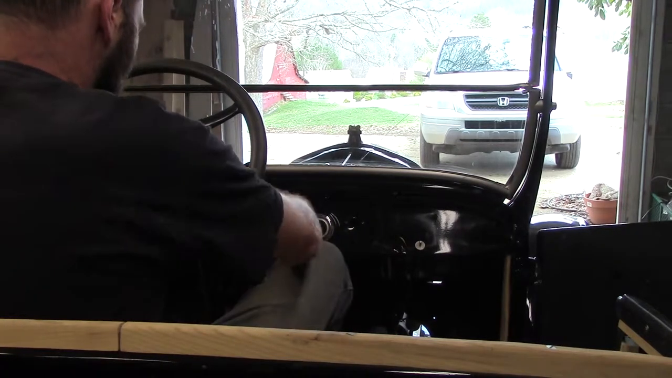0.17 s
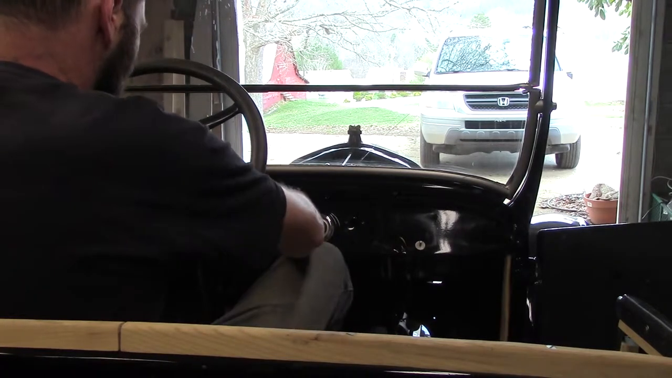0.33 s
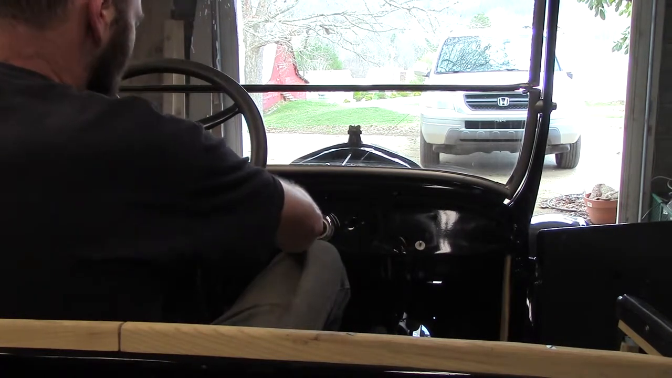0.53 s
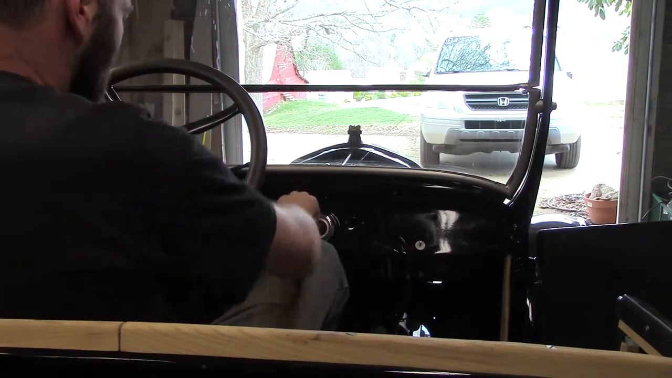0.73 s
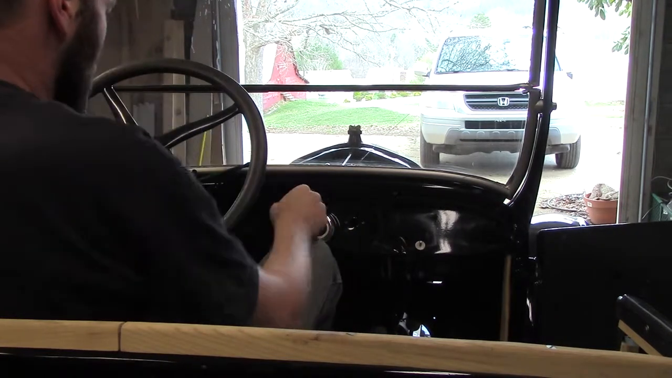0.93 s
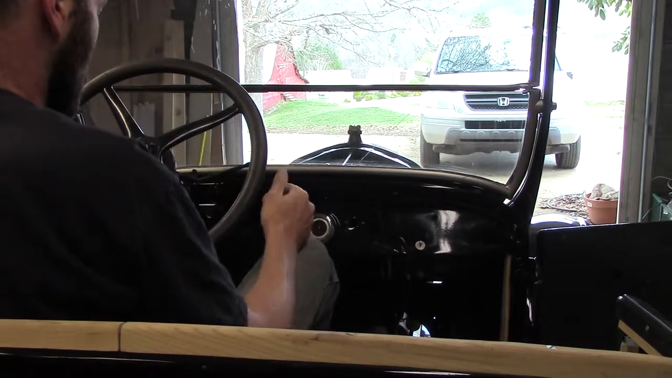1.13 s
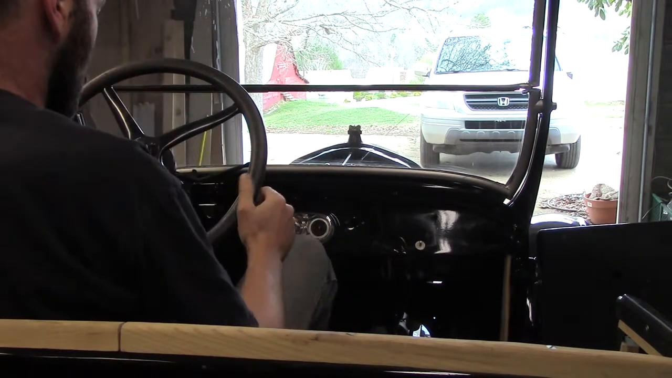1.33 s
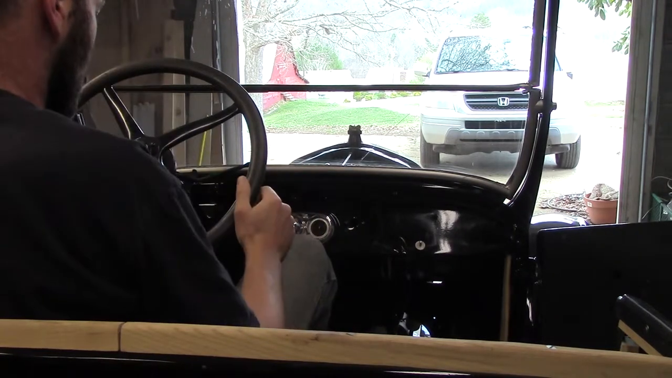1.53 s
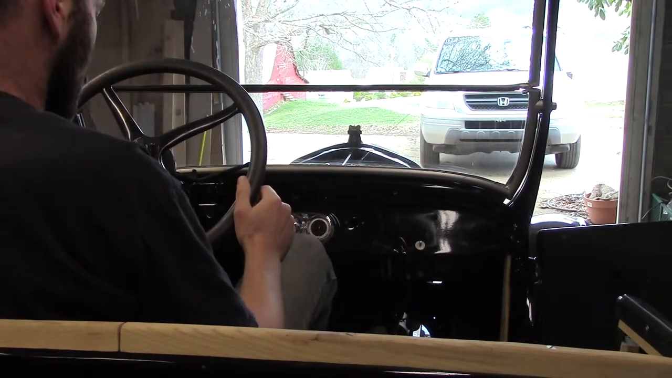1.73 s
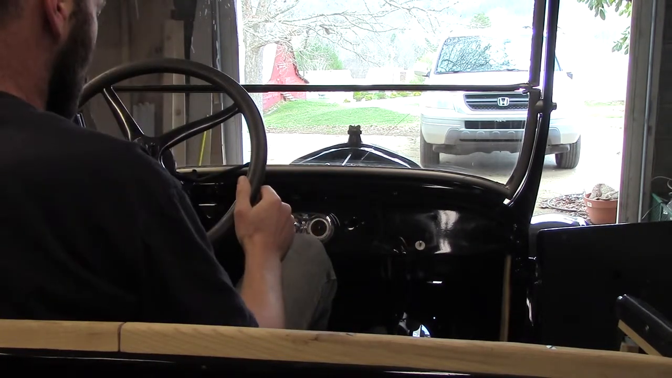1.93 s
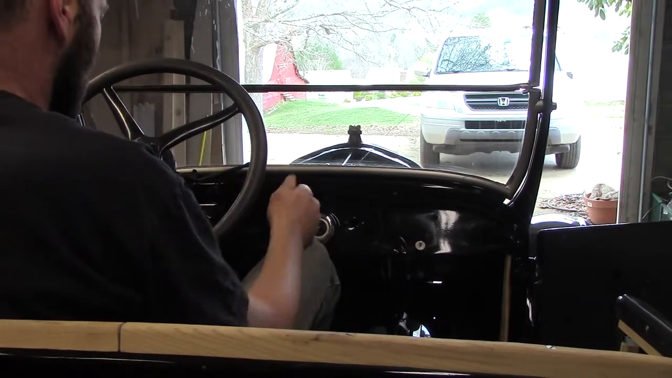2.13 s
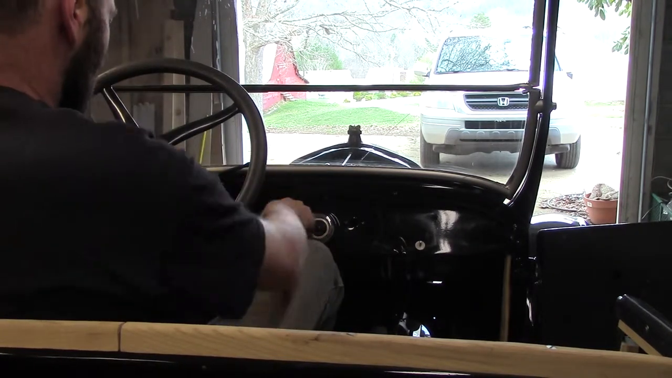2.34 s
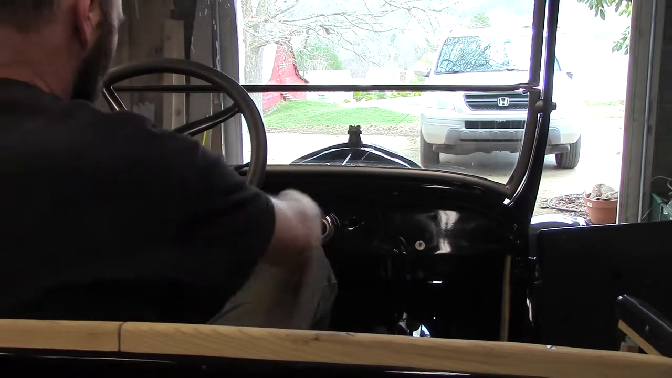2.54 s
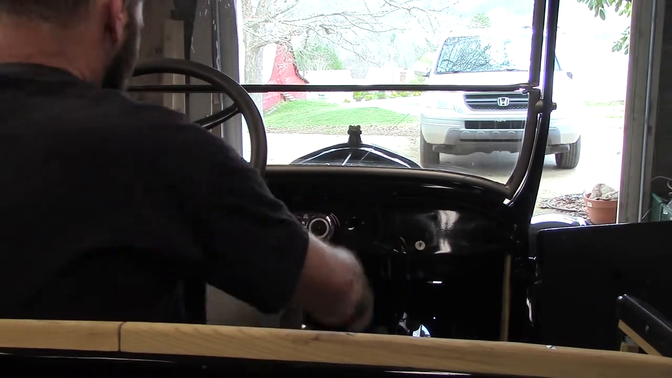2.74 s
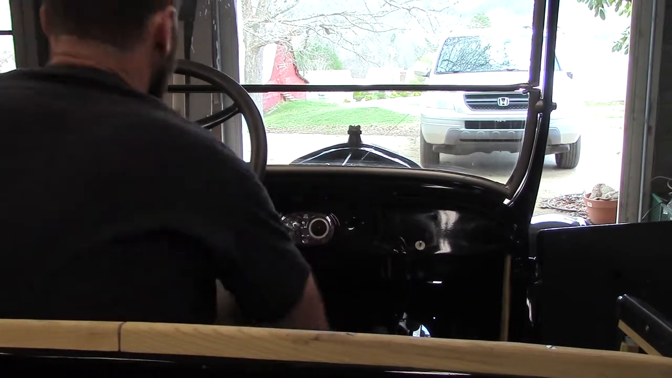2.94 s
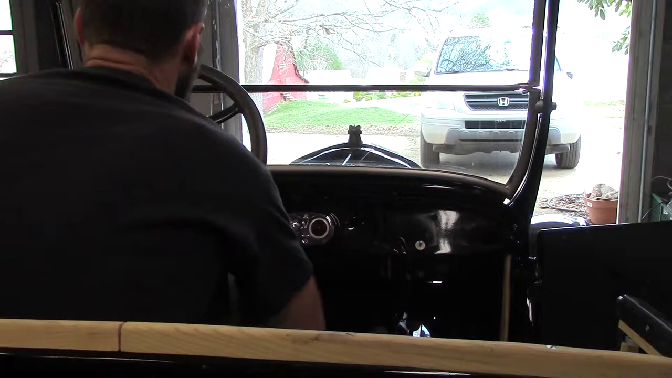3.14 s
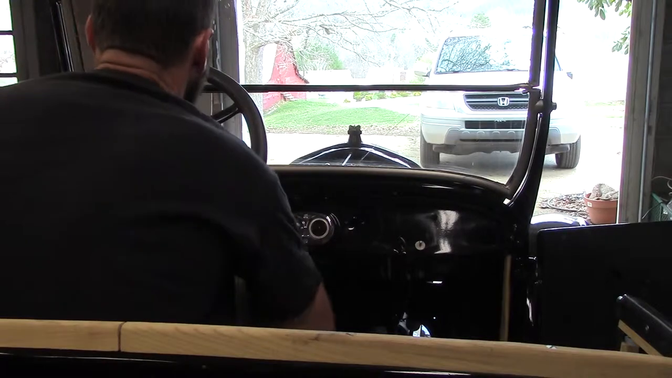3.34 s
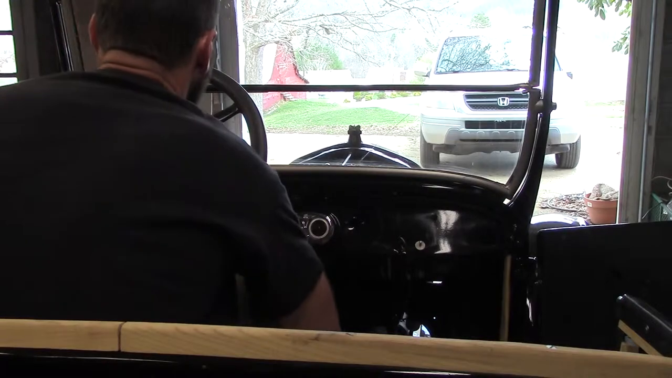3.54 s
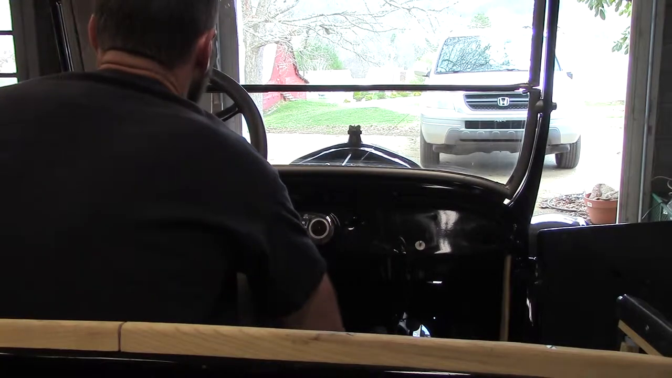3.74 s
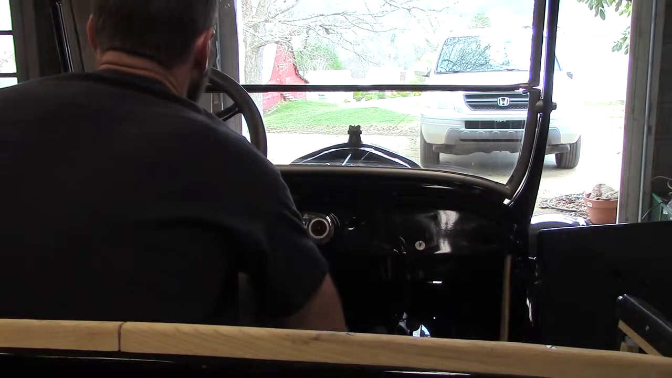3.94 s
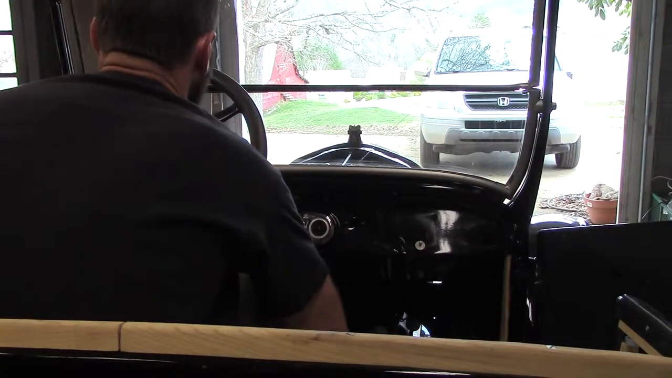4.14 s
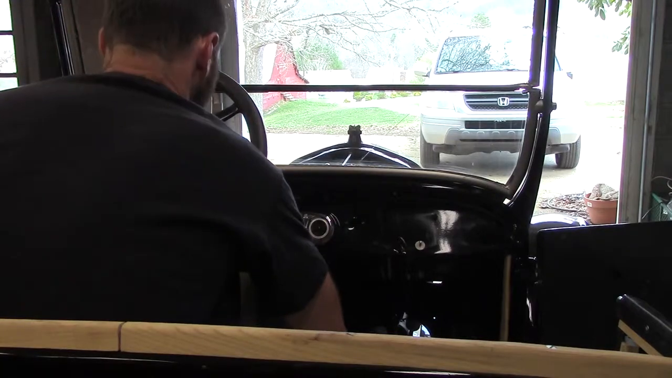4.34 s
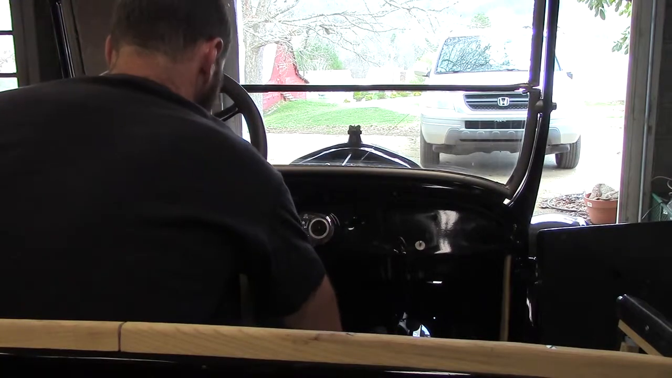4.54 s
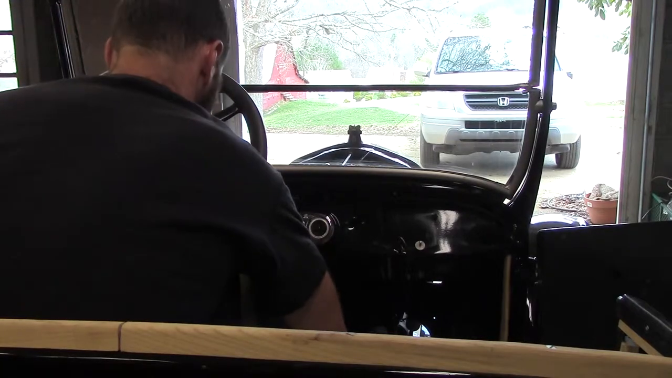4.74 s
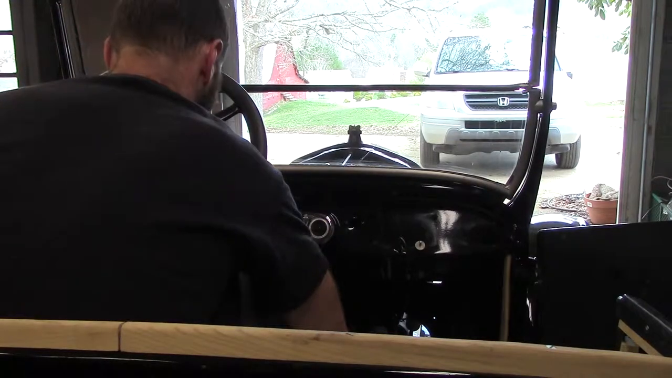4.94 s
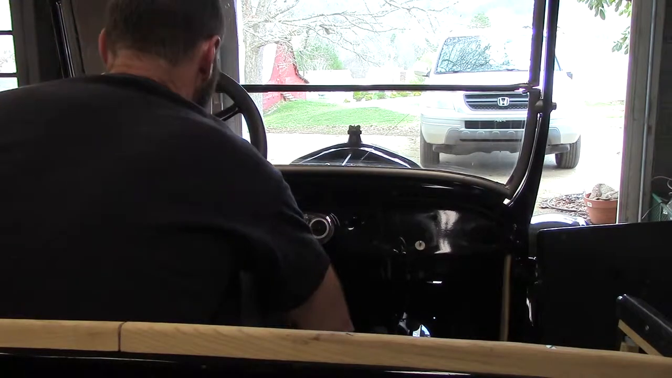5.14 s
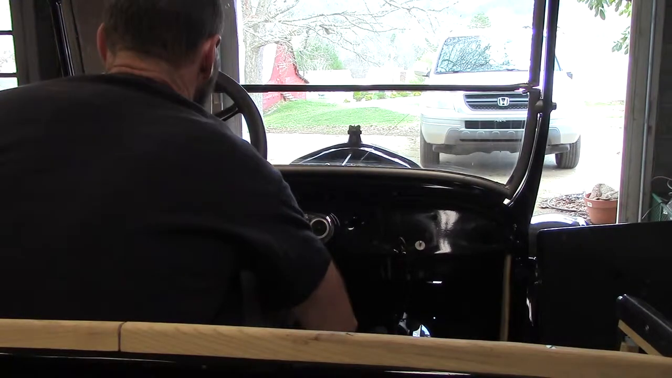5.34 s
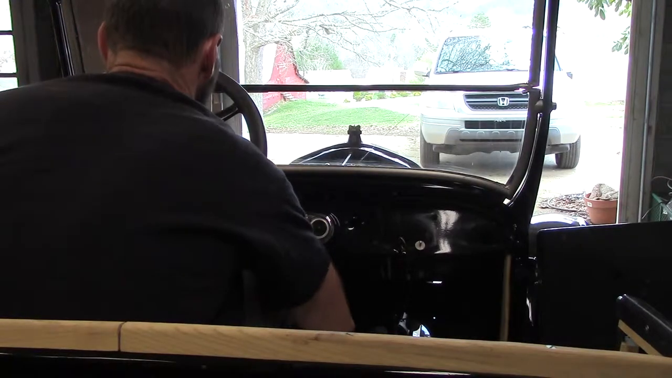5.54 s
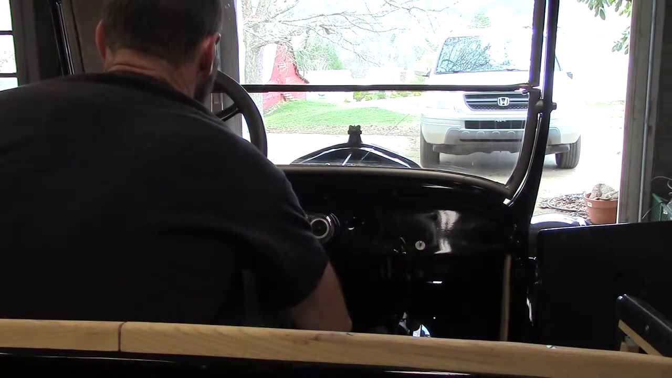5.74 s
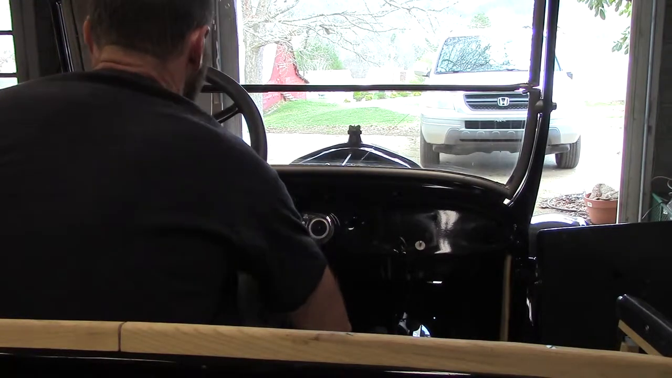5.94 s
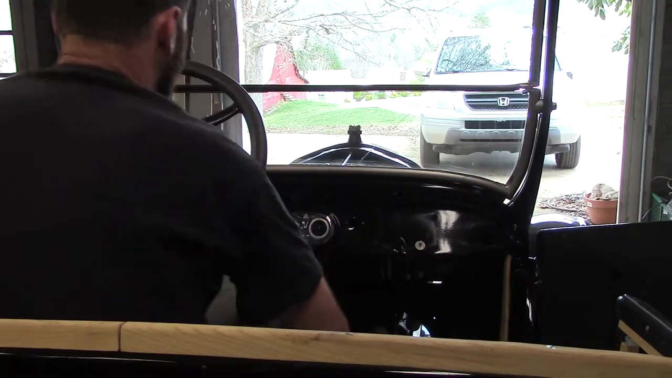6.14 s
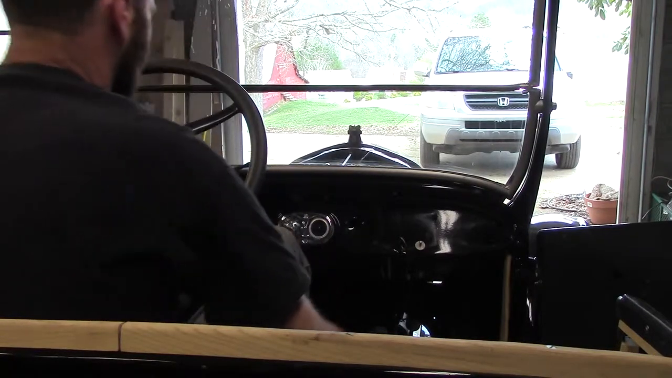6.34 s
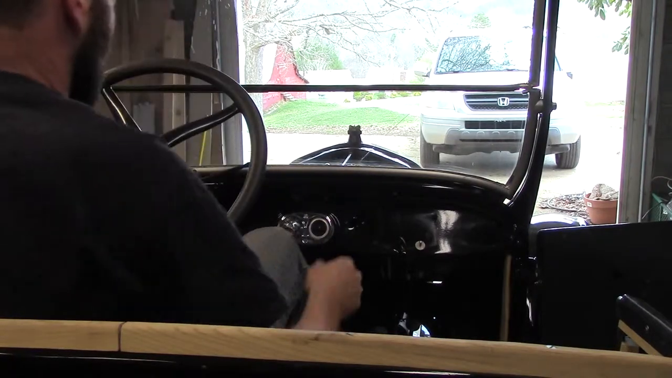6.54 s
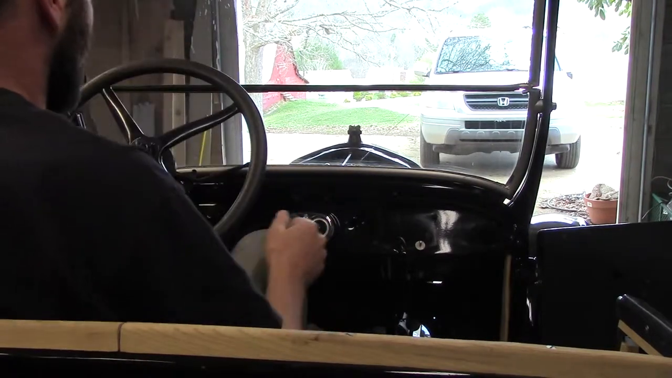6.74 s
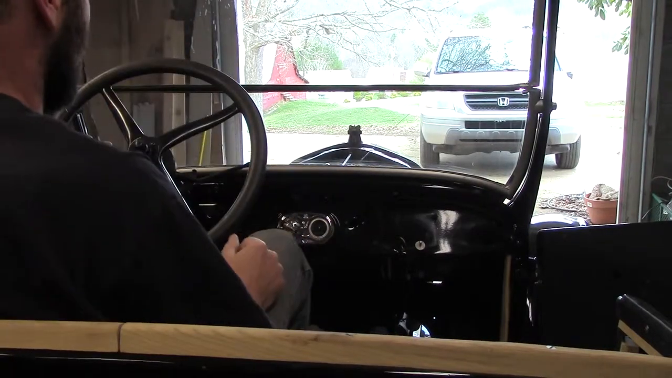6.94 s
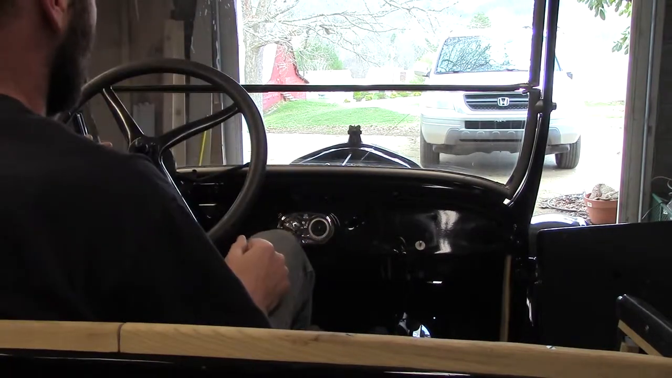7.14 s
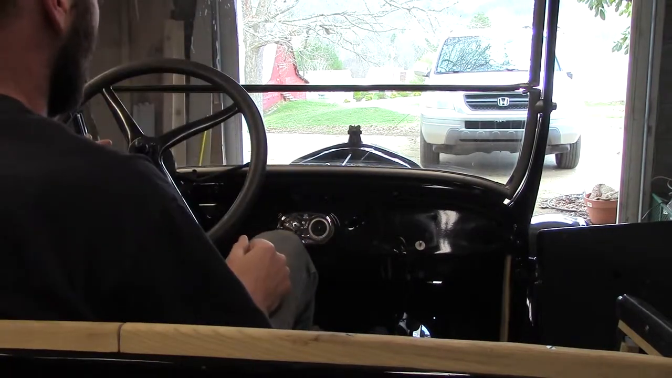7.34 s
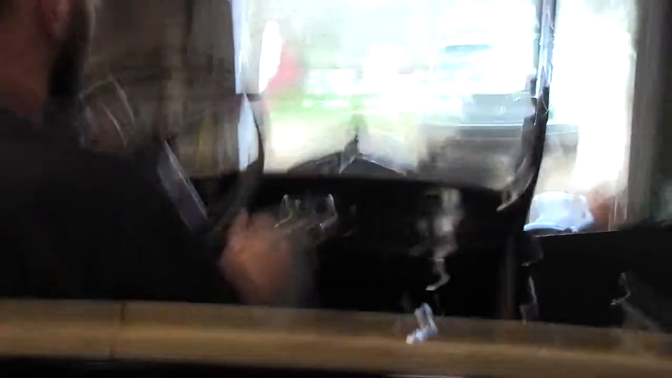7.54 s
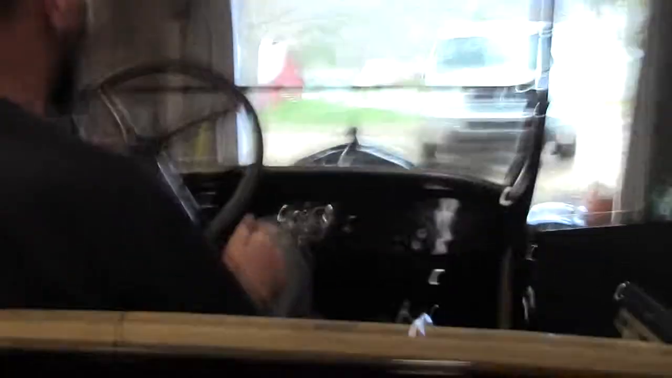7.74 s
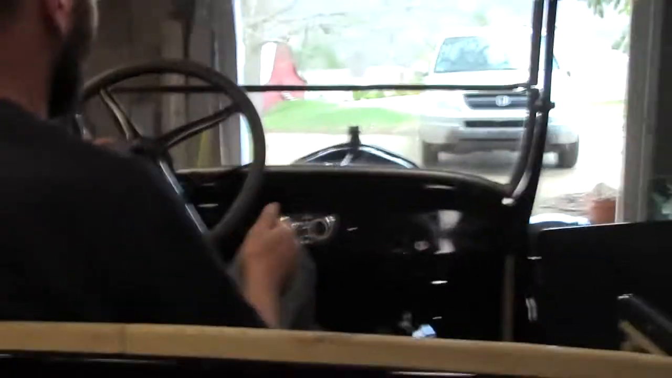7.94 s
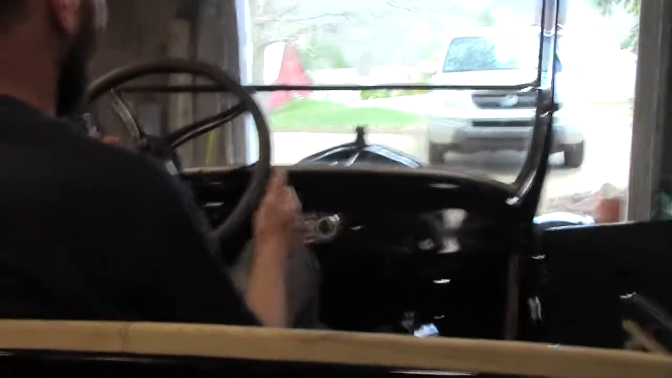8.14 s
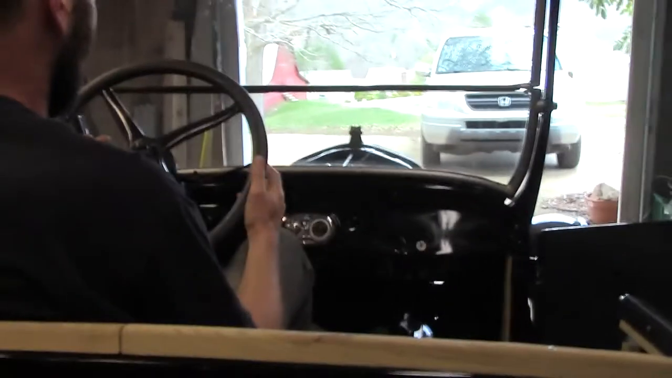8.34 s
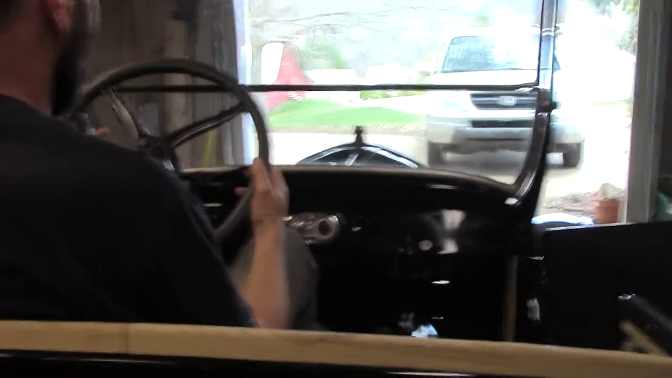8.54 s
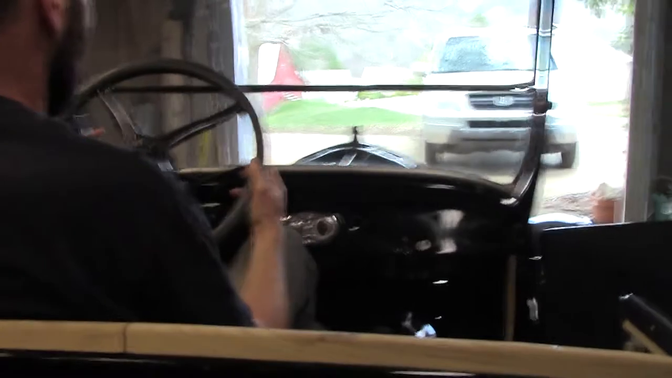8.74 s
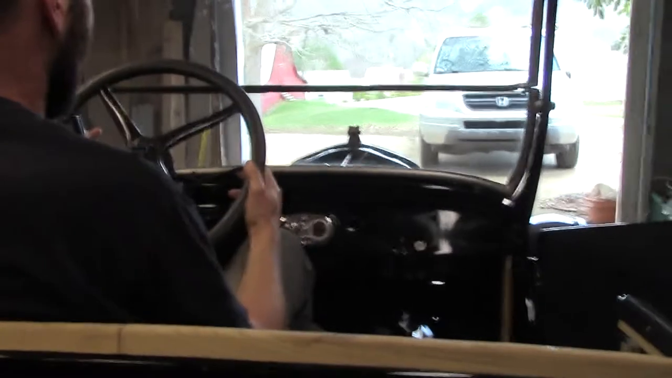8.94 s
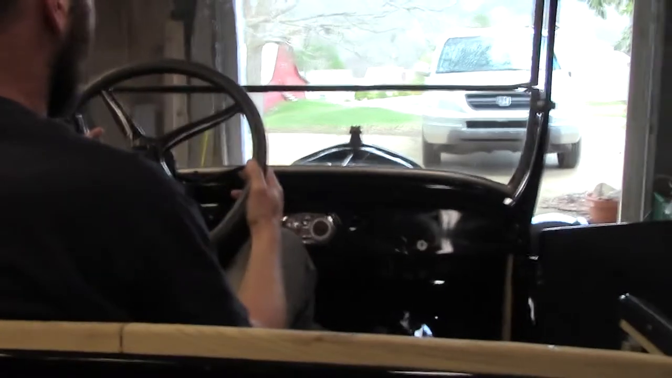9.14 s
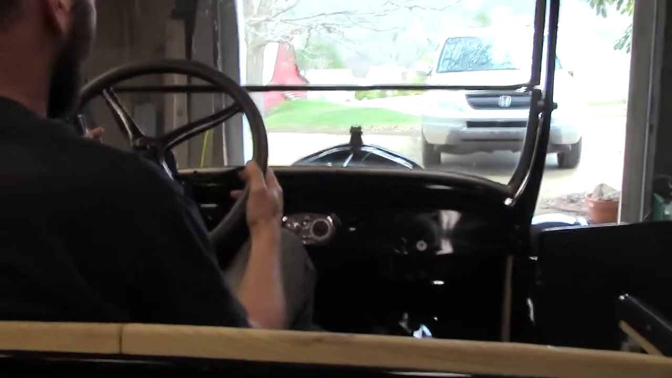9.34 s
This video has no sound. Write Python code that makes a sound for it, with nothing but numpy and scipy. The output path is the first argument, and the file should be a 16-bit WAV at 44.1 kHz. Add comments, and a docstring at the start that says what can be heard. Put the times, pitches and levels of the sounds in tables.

```python
"""An old car in an open garage, heard from close by through the two ports of one camera microphone.
Outside, a motor drones steadily throughout. Near at hand the driver shifts about, works key and levers
and knocks the floorboards. At 5.5 s the spring blade of an ignition coil starts to buzz. Two seconds
later the starter grinds into the flywheel and the buzz dies away; the engine is cranked, wheezing at
every compression, and the body shudders on its springs."""
import sys
import numpy as np
from scipy import signal
from scipy.fft import rfft, irfft, next_fast_len
from scipy.io import wavfile
from scipy.ndimage import map_coordinates

SR = 44100
rng = np.random.default_rng(int(sys.argv[2]) if len(sys.argv) > 2 else 0)


def put_to_file(sound):
    """Save the sound as 16-bit audio at rate SR, in the file named by the first command-line argument."""
    columns = np.atleast_2d(sound).T  # one column per channel
    safe = np.clip(columns, -1, 1)
    whole_steps = np.round(safe * 32767)
    wavfile.write(sys.argv[1], SR, whole_steps.astype(np.int16))


N = 418068
T = np.arange(N) / SR
PINION_S, MESH_S = 7.44, 7.5  # the starter pinion spins up, then meets the flywheel


def amp(db):
    """Decibels to gain."""
    return 10 ** (np.asarray(db) / 20)


def unit(x):
    """Scaled to rms 1."""
    return x / np.sqrt(np.mean(x ** 2) + 1e-20)


def along(points, hz):
    """Interpolate (freq_hz, value) points on a log frequency axis."""
    freqs, values = np.transpose(points)
    return np.interp(np.log(hz + 1), np.log(freqs + 1), values)


def rise(start_s, time_s):
    """Zero before the start, then an exponential approach to 1."""
    return 1 - np.exp(-np.maximum(T - start_s, 0) / time_s)


def wobble(rate):
    """A smooth random curve, rate knots a second."""
    return map_coordinates(rng.standard_normal(int(N * rate / SR) + 4), [T * rate])


def filtered(x, response):
    """x through a complex frequency response."""
    size = next_fast_len(x.shape[-1] + SR // 4)
    return irfft(rfft(x, size) * response(np.fft.rfftfreq(size, 1 / SR)), size)[..., :x.shape[-1]]


def colour(points):
    """A smooth response through (freq_hz, level_db) points, cut steeply below the first."""
    low_hz = points[0][0]
    return lambda f: amp(along(points, f)) * (f > low_hz / 2) * np.minimum(1, f / low_hz) ** 8


def modes(table):
    """The response of (pitch_hz, width_hz, level_db) resonances, summed with alternating signs."""
    return lambda f: sum((-1) ** k * amp(db) * 1j * f * width / (hz * hz - f * f + 1j * f * width + 1e-9)
                         for k, (hz, width, db) in enumerate(table))


def contacts(rate, scatter_db, share):
    """Irregular impacts, rate a second, over a bed of noise; share of the power is in the impacts."""
    hits = (rng.random(N) < rate / SR) * amp(scatter_db * rng.standard_normal(N))
    hits *= rng.choice([-1, 1], N)
    return np.sqrt(share) * unit(hits) + np.sqrt(1 - share) * rng.standard_normal(N)


def damped_tones(table, rise_s):
    """Each row swings at one frequency and dies away."""
    out, t = np.zeros(N + SR), np.arange(SR // 2) / SR
    for start_s, db, hz, t60 in table:
        envelope = amp(db - 60 * t / t60) * (1 - np.exp(-t / rise_s))
        out[round(start_s * SR):][:len(t)] += envelope * np.sin(2 * np.pi * hz * t)
    return out[:N]


def motor_outside():
    """A motor drones at multiples of its shaft speed, which waver in groups, over the outdoor murmur."""
    # partials of the drone: shaft_multiple, level_db
    orders = [(2, -73.5), (4, -52), (5, -82), (7, -47), (8, -51), (10, -46.5), (12, -47.5), (13, -67),
              (14, -58), (15, -56), (16, -56.5), (17, -70), (19, -56.5), (20, -52.5), (23, -69), (24, -84),
              (26, -58.5), (28, -60), (30, -52.5), (32, -64.5), (33, -71.5), (34, -60.5), (35, -70),
              (36, -72), (37, -72), (38, -62.5), (41, -70), (52, -92), (54, -62.5), (56, -82), (58, -92),
              (60, -75), (62, -74), (68, -68.5), (70, -67), (74, -63.5), (76, -66), (78, -67)]
    # outdoor murmur: freq_hz, level_db
    air_spectrum = [(24, -63), (40, -45), (98, -12), (147, -10), (193, -1.5), (334, -3.5), (388, -11),
                    (550, -3.5), (672, -13.5), (841, -9.5), (1420, -14.5), (2120, -18.5), (2400, -19.5),
                    (6200, -32), (15600, -54.5)]
    shaft_hz = 28.143
    angle = 2 * np.pi * shaft_hz * T
    waver = [amp(1.68 * wobble(3.01)) for group in range(4)]
    drone = sum(waver[round(k) % 4] * amp(db) * np.sin(round(k) * angle + 2 * np.pi * rng.random())
                for k, db in orders)
    murmur = unit(filtered(rng.standard_normal(N), colour(air_spectrum)))
    return np.sqrt(2) * drone + amp(-45 + 0.43 * wobble(3.94)) * murmur


def driver():
    """Cloth rustles in grains; seat and floor answer the shifting weight; each move swells and dies."""
    # the driver's movements: start_s, cloth_db, seat_db, time_to_peak_s
    moves = [(0, -62, -46, 0.028), (.13, -49, -42, 0.056), (.36, -51, -50, 0.018), (.68, -39, -34.5, 0.039),
             (.9, -49.5, -49, 0.065), (1.63, -42.5, -43, 0.038), (2.03, -54, -50, .04),
             (2.12, -47, -45, .04), (2.28, -49.5, -52, .07), (2.42, -52, -46, .02),
             (2.55, -51.5, -48, 0.088), (3.02, -46, -36.5, 0.053), (3.27, -46.5, -39, 0.038),
             (3.49, -52, -50, .02), (3.72, -49.5, -39.5, .06), (3.87, -46.5, -38, .04),
             (5.03, -32.5, -35, 0.018), (5.15, -49, -38, .05), (5.4, -46.5, -53, 0.023)]
    # rustling cloth: freq_hz, level_db
    cloth_spectrum = [(1200, 14.5), (2500, 7.5), (6000, -3.5), (10000, -13.5), (15700, -71)]
    # creaking seat and floor: freq_hz, level_db
    seat_spectrum = [(80, -7), (150, 12.5), (400, 14), (1000, 3), (2000, -27.5)]
    cloth_power, seat_power = amp(-66) ** 2, amp(-44.5) ** 2  # while sitting still
    for start_s, cloth_db, seat_db, peak_s in moves:
        age = np.maximum(T - start_s, 0) / peak_s
        swell = age * np.exp(1 - age)
        cloth_power += (amp(cloth_db) * swell) ** 2
        seat_power += (amp(seat_db) * swell) ** 2
    rustle = unit(filtered(contacts(900, scatter_db=8.0, share=0.25), colour(cloth_spectrum)))
    creak = unit(filtered(contacts(200, scatter_db=2.5, share=0.35), colour(seat_spectrum)))
    return np.sqrt(cloth_power) * rustle + np.sqrt(seat_power) * creak


def thuds():
    """Soft pushes set the floor swinging."""
    # weight drops on seat or floor: start_s, level_db, pitch_hz, t60_s
    drops = [(.03, -27, 114, 0.43), (3.1, -34, 97, 0.37), (3.201, -37, 100, 0.23), (5.645, -37, 98, 0.37)]
    return damped_tones(drops, rise_s=0.013)


def knocks():
    """Each blow is a dying rattle, duller or brighter, that rings the struck part and the car body."""
    # blows on levers, pedals, boards and flywheel: start_s, peak_db, boards_db, treble_db, part_hz
    blows = [(0.139, -28.5, -8, -4, 2300), (0.173, -33, -10, -11, 2280), (0.371, -29, -2, -11, 497),
             (0.672, -26.5, -9, 0, 840), (0.701, -19.5, -17, -9, 1900), (0.911, -32, -4, -8, 557),
             (0.985, -34.5, -6, -10, 557), (1.664, -22, 1.5, -4, 580), (2.089, -43, -10, 6, 860),
             (2.436, -39, -6, -5, 860), (2.57, -32, -6, -19, 550), (2.797, -34.5, 7, 5, 870),
             (3.036, -21, 10, -8.5, 654), (3.06, -27, 3, -7, 840), (3.197, -30.5, 6, -8, 517),
             (3.309, -27.5, 20, 3.5, 647), (5.034, -15, -11, -14.5, 548), (5.072, -22, 8, -19, 420),
             (5.148, -17.5, 6, -11.5, 497), (5.411, -33.5, 10, 3, 557), (5.633, 2, -6, 3.5, 2830),
             (5.679, -4.5, -2, -11, 1220), (7.44, -19, 5, 1, 400), (7.501, -8, 4, -1, 595),
             (7.533, 0.5, -3, -7.5, 545), (7.595, -2, 5, -12, 720), (7.718, -2, 12, -9, 703),
             (7.773, -7, -4, -13, 540)]
    # sheet metal and boards of the car: pitch_hz, width_hz, level_db
    body_modes = [(352, 63, -12), (1155, 45, -7), (1360, 40, -21), (2390, 31, -8), (2610, 37, -2),
                  (2810, 60, 2), (3620, 30, -25), (4870, 48, 7), (5910, 68, 1), (8400, 100, -15),
                  (10270, 100, 2)]
    t60_s, rise_s = 0.06, 0.0053
    out, t = np.zeros(N + SR), np.arange(SR // 3) / SR
    body = modes(body_modes)
    for start_s, peak_db, boards_db, treble_db, part_hz in blows:
        rattle = rng.standard_normal(len(t)) * amp(-60 * t / t60_s) * (1 - np.exp(-t / rise_s))
        bands = [(200, boards_db - 13.5), (450, boards_db), (1500, 0),
                 (5000, treble_db), (12000, treble_db - 9)]
        tilt = colour([(hz, db - 10 * np.log10(hz / 1500)) for hz, db in bands])
        part = modes([(part_hz, 0.061 * part_hz, 4.5)])
        blow = filtered(rattle, lambda f: tilt(f) * (1 + 0.95 * body(f) + part(f)))
        out[round(start_s * SR):][:len(t)] += amp(peak_db) * blow / np.abs(blow).max()
    return out[:N]


def garage(x):
    """The room answers a few milliseconds late; its bass lingers longest."""
    # reverberation: freq_hz, t60_s
    decay = [(200, 0.99), (1000, 0.39), (4000, 0.29), (12000, 0.19)]
    hz, t, spectra = signal.stft(rng.standard_normal(SR // 2), SR, nperseg=256)
    tail = signal.istft(spectra * amp(-60 * t / along(decay, hz)[:, None]), SR, nperseg=256)[1]
    return signal.fftconvolve(np.pad(x, (250, 0)), tail / np.linalg.norm(tail))[:N]


def key_jingles():
    """The key swings against its ring and chimes a little differently each time."""
    # touches of key and ring: start_s, level_db
    touches = [(.702, -24), (.716, -20.5), (.912, -52)]
    # partials of the key: pitch_hz, level_db, t60_s
    partials = [(6510, -27, 0.91), (9450, 2.5, 0.084), (10770, -27, 0.18), (12060, -18, 0.15)]
    out, t = np.zeros(N + SR), np.arange(SR // 3) / SR
    for start_s, touch_db in touches:
        chime = sum(amp(db + rng.normal(0, 1.5) - 60 * t / t60) * np.sin(2 * np.pi * hz * t)
                    for hz, db, t60 in partials)
        out[round(start_s * SR):][:len(t)] += amp(touch_db) * chime * (1 - np.exp(-t / 0.003))
    return out[:N]


def pings():
    """Small parts ping briefly, mostly when a blow strikes."""
    # ringing parts: start_s, level_db, pitch_hz, t60_s
    parts = [(1.625, -48, 6500, 0.097), (1.67, -29.5, 570, 0.21), (1.668, -39, 4380, .12),
             (3.045, -43, 6000, .08), (5.64, -31, 4950, 0.25), (7.595, -10, 4550, 0.023)]
    return damped_tones(parts, rise_s=0.0017)


def ignition_coil():
    """A spring blade chatters on its contact and sparks; the chatter rings the coil box."""
    # coil box and spring blade: pitch_hz, width_hz, level_db
    box_modes = [(854, 24, -2.5), (2420, 19, -5.5), (3199, 45, -1), (3222, 13, 0), (4030, 16, -10.5),
                 (6000, 240, -5.5), (6680, 230, -15.5), (7170, 290, -9.5), (8670, 220, -12.5),
                 (10600, 160, -16.5), (12300, 160, -20), (13900, 270, -6.5)]
    # sparks at the contact: freq_hz, level_db
    spark_spectrum = [(1000, -1.5), (1500, -13), (3000, -4), (4700, -11), (6500, -2.5), (8000, -27),
                      (9400, -14.5), (13000, -9.5), (15600, -35)]
    on_s, shaken_s, blade_hz, sag_db_per_s = 5.5, 5.66, 644.7, 40
    battery = amp(-sag_db_per_s * np.maximum(T - MESH_S, 0))  # drained by the starter
    supply = rise(on_s, 0.015) * battery
    shaken_db = 12 * (T > shaken_s) * (1 - rise(shaken_s, 0.12))  # the loud blow shakes the blade
    blade_gain = amp(-45.5 + shaken_db + 2.1 * wobble(3.6))
    chatter = contacts(2500, scatter_db=2, share=0.4) * amp(0.8 * wobble(12))
    box = unit(filtered(chatter, modes(box_modes)))
    sparks = unit(filtered(chatter, colour(spark_spectrum)))
    blade = unit(filtered(rng.standard_normal(N), modes([(blade_hz, 12, 0)])))
    buzz = 0.88 * amp(0.95 * wobble(45)) * box + 0.53 * sparks
    return supply * (amp(-38.5) * buzz + blade_gain * blade)


def cranking(level_db, swing_db, follows=1):
    """Gain that rises with the pinion, then surges with each stroke; follows scales stroke strength."""
    # piston strokes, each from where a compression held the engine back: start_s, strength_db
    strokes = [(7.5, -1), (7.745, 1), (8.05, 1), (8.31, 0.5), (8.56, -0.5), (8.8, -0.5), (9.04, 2),
               (9.28, 1.5), (9.52, 1)]
    surge_at = 0.37  # share of a stroke at which the speed peaks
    starts, strength_db = np.transpose(strokes)
    index = np.arange(len(starts))
    count = np.interp(T, starts, index)
    surge = -np.cos(np.pi * np.interp(count % 1, [0, surge_at, 1], [0, 1, 2]))
    effort_db = np.interp(count - surge_at, index, strength_db)
    spin = rise(PINION_S, 0.004) * amp(np.where(T < MESH_S, -7 + 120 * (T - MESH_S), 0))
    return spin * amp(level_db + follows * effort_db + swing_db * surge)


def starter_grind(teeth, binding):
    """Worn teeth hammer unevenly into the starter housing and rattle the flywheel casing."""
    # starter housing: pitch_hz, width_hz, level_db
    housing_modes = [(286, 18, -7.5), (345.7, 13, 3.5), (446, 65, -8), (511.4, 17, 2.5), (582.4, 44, -0.5),
                     (714.4, 20, 4.5), (841, 22, -11.5)]
    # grinding teeth: freq_hz, level_db
    grind_spectrum = [(120, -66), (200, -16.5), (291, -7), (384, -6), (584, -4), (777, -5), (1200, -13),
                      (1560, -33), (2640, -120)]
    # flywheel casing: pitch_hz, width_hz, level_db
    casing_modes = [(1228, 25, -3.5), (1415, 32, 6), (1634, 67, 3), (1918, 95, 4), (2083, 67, -0.5),
                    (2183, 90, 3.5), (2606, 48, -1.5), (3020, 78, -35), (4220, 150, -15.5)]
    # rattle in the casing: freq_hz, level_db
    rattle_spectrum = [(800, -16), (1100, -3.5), (2700, -3.5), (3000, -9.5), (4500, -16), (6000, -55)]
    housing = unit(filtered(teeth, lambda f: colour(grind_spectrum)(f) * (0.48 + modes(housing_modes)(f))))
    casing = unit(filtered(teeth, lambda f: colour(rattle_spectrum)(f) * (0.4 + modes(casing_modes)(f))))
    grind = cranking(-12.5 + 0.27 * binding, swing_db=0.87, follows=0.74) * housing
    rattle = cranking(-16.5 + 0.39 * binding, swing_db=2) * casing
    return grind + rattle


def intake_wheeze(binding):
    """Air hisses at the intake, swelling with every stroke."""
    # rushing air: freq_hz, level_db
    spectrum = [(2060, -5), (3500, -0.5), (3800, 1.5), (4330, -2), (4640, -2.5), (7320, -8.5),
                (10500, -16.5), (14300, -23.5), (15600, -27)]
    air = unit(filtered(contacts(150, scatter_db=3.5, share=0.088), colour(spectrum)))
    return cranking(-30 + 0.41 * binding + 2.0 * wobble(50), swing_db=3.5) * air


def body_rocking():
    """The cranked car rocks: its panels shudder and the body throbs on its springs."""
    # course of the rocking: time_s, shudder_db, throb_db
    rocking = [(7.44, -45, -65), (7.54, -35, -36), (7.62, -13, -23.5), (7.74, -16, -26.5), (7.89, -28, -23),
               (7.95, -33, -43), (8.01, -19, -43), (8.1, -29.5, -27.5), (8.3, -29, -32.5), (8.9, -29, -35),
               (8.96, -26, -28.5), (9.3, -28.5, -31), (9.42, -30.5, -20), (9.48, -31, -32)]
    # shuddering panels: freq_hz, level_db
    panel_spectrum = [(110, -15), (140, 0), (180, 10), (260, -1), (350, -50)]
    # the body on its springs: pitch_hz, width_hz, level_db
    spring_modes = [(113.7, 17, 0)]
    times, *levels = np.transpose(rocking)
    shudder, throb = [amp(np.interp(T, times, db, left=-200, right=-200)) for db in levels]
    panels = unit(filtered(rng.standard_normal(N), colour(panel_spectrum)))
    springs = unit(filtered(rng.standard_normal(N), lambda f: modes(spring_modes)(f) ** 2))
    return shudder * panels + throb * springs


def singing_metal(teeth):
    """The teeth set metal singing while the starter gathers speed; it fades in slowly and out fast."""
    # singing metal: pitch_hz, width_hz, level_db
    metal_modes = [(3255, 43, -4), (4150, 70, 1), (5700, 140, -10.5), (8480, 140, -8), (10120, 180, -11.5),
                   (10400, 120, -15), (13000, 200, -20)]
    full_from_s, full_until_s = 7.8, 8.17
    fade_db = 28.6 * np.maximum(full_from_s - T, 0) + 110 * np.maximum(T - full_until_s, 0)
    ringing = unit(filtered(teeth, modes(metal_modes)))
    return cranking(-33.5 - fade_db + 1.5 * wobble(40), swing_db=4) * ringing


def starter():
    """The pinion's teeth strike the flywheel and turn the engine over."""
    teeth = contacts(700, scatter_db=3.5, share=0.55)
    binding = wobble(30)  # the mesh binds and frees as the pinion turns
    return starter_grind(teeth, binding) + intake_wheeze(binding) + body_rocking() + singing_metal(teeth)


def scene():
    """Nearly mono: the ports differ by a faint diffuse copy of what is near and by their own low hiss."""
    # near sound, side against mid: freq_hz, level_db
    side_spectrum = [(60, -11), (150, -36.5), (380, -34), (950, -23.5), (2380, -21.5), (5980, -15.5),
                     (15000, -17)]
    # the microphone ports' own faint low hiss: freq_hz, level_db
    port_hiss_spectrum = [(15, -48), (25, -18), (69, -21), (102, -4), (286, -2.5), (2210, -16), (9000, -31),
                          (11700, -60), (19800, -120)]
    blows = knocks() + key_jingles() + pings()
    near = driver() + thuds() + blows + amp(-2) * garage(blows) + ignition_coil() + starter()
    scatter = rng.standard_normal(4000) * np.hanning(8000)[4000:] ** 2  # reflections arrive unequally
    diffuse = signal.fftconvolve(near, scatter / np.linalg.norm(scatter))[:N]
    side = filtered(diffuse, lambda f: amp(along(side_spectrum, f)))
    side += amp(-62) * unit(filtered(rng.standard_normal(N), colour(port_hiss_spectrum)))
    mid = near + motor_outside()
    return np.array([amp(0.17) * mid + side, amp(-0.04) * mid - side])


def record(dry):
    """The camera clips softly near full scale, colours the sound and cuts the highest treble."""
    # microphone response: freq_hz, gain_db
    response = [(25, -14), (60, -0.5), (90, -1), (11000, 0.5), (14000, -6.5), (15700, -5)]
    ceiling, top_hz = 0.89, 15770
    clipped = dry / (1 + np.abs(dry / ceiling) ** 5) ** (1 / 5)
    return filtered(clipped, lambda f: amp(along(response, f)) * (f < top_hz))


dry = scene()
out = record(dry)
put_to_file(out)
```